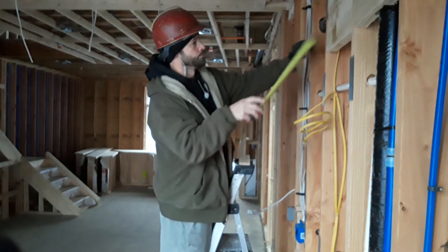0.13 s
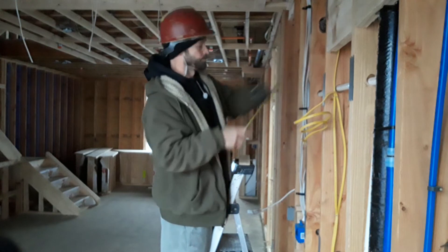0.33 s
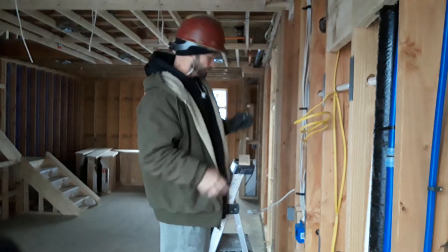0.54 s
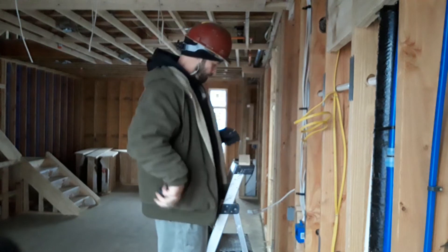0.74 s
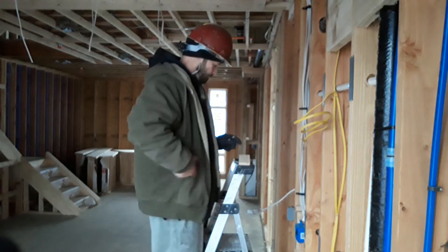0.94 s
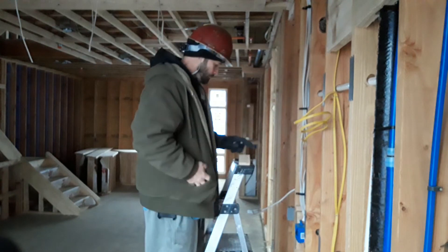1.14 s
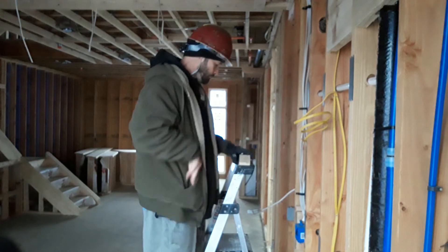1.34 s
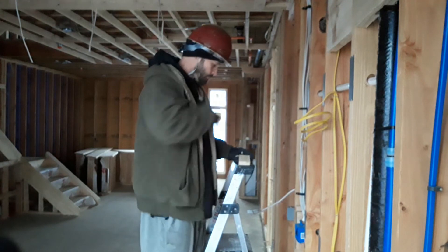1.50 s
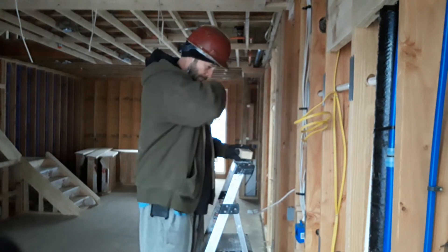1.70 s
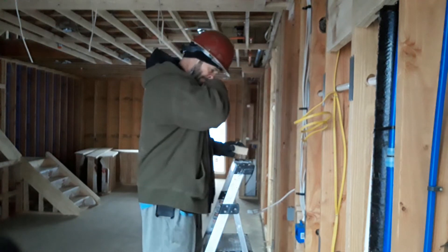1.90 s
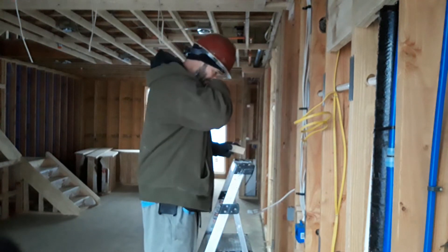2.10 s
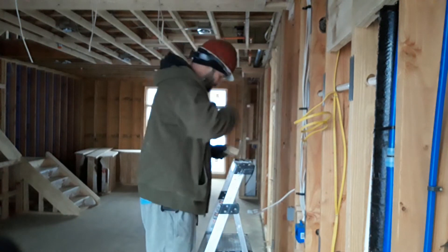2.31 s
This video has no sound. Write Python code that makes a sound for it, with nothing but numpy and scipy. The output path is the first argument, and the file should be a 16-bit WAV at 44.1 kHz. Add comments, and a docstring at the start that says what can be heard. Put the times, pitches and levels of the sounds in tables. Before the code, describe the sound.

A steel tape measure blade starts running back with a light clack at 0.1 s, rasping brightly with slaps around 0.25 and 0.33 s. At 0.49 s the hook slams into the case, a loud hard snap with rapid bounces and short room reverberation. Faint clacks follow near 1.3 and 1.6 s, then jacket rustle and a clearer knock around 2.05 s. A low wavering engine hum continues throughout.

```python
"""Tape measure snapping shut

A steel tape measure runs back into its case in a bare timber-framed room: grains of noise scrape, short
bursts slap, then the hook slams home, bounces and rings the case through banks of resonances. Light clacks
and knocks fall around it as damped bursts, a jacket sleeve rubs as coloured grains, and an engine outside
hums as a stack of wavering sines over drone and noise. A small two-port microphone hears it."""
import sys
import numpy as np
from scipy import signal
from scipy.fft import rfft, irfft
from scipy.io import wavfile
from scipy.ndimage import uniform_filter1d, minimum_filter1d

SR = 44100
rng = np.random.default_rng(int(sys.argv[2]) if len(sys.argv) > 2 else 0)


def bounce(signal):
    """Save signal as a 16-bit WAV file at the path given by the first command-line argument."""
    frames = np.transpose(np.atleast_2d(signal))
    limited = np.clip(frames, -1, 1)
    pcm = np.round(limited * 32767).astype(np.int16)
    wavfile.write(sys.argv[1], SR, pcm)


N = 103635
T = np.arange(N) / SR  # time [s]

# Source levels are set ahead of the room and the microphone; colours and modes are relative.
# Scrape of the running blade: (time [s], level [dB])
BLADE_RUN = [(0, -69), (.05, -51.5), (.072, -36.5), (.11, -47.5), (.135, -47.5), (.152, -33.5), (.19, -33),
             (.235, -35), (.3, -34), (.335, -34), (.37, -36), (.48, -36.5)]
# Colour of the blade: (frequency [Hz], level [dB])
BLADE_COLOUR = [(150, -23), (400, -12.5), (900, -8.5), (1500, -3), (2300, 1), (3500, 6), (5000, -2.5),
                (7000, 6), (9000, 1), (12000, 3), (15500, 3.5)]
# Resonances of the blade and its spool: (frequency [Hz], width before damping [Hz], level [dB])
BLADE_MODES = [(2370, 15, -7), (4690, 56, -5.5), (5100, 43, -5), (5430, 190, 3), (6930, 144, -10)]
BLADE_RING_DB, BLADE_DAMPING = -10.5, 2.6  # damping multiplies the mode widths
BLADE_GRAINS_PER_S, BLADE_SPREAD_DB = 6400, -1.5
FLUTTER_DB, FLUTTER_HZ = 4, 70.7
# Slaps of the blade at the mouth of the case: (time [s], level [dB], chatter setting [s])
SLAPS = [(0.2475, 4, 0.0029), (0.2572, -8, 0.0025), (0.33, -2.5, .005), (.341, -8, 0.0061)]
# Colour of the slaps: (frequency [Hz], level [dB])
SLAP_COLOUR = [(200, -16), (600, -3.5), (1100, 3.5), (1600, 3.5), (2300, 2), (3500, 1), (5000, 6.5),
               (7000, 2.5), (15500, -0.5)]

# The hook hits the case and bounces: (time [s], level [dB], chatter setting [s])
SNAP = [(0.4855, 11.5, 0.0019), (0.4888, 8, 0.0028), (0.4955, 10, 0.0026), (.502, 3, 0.005),
        (0.5145, 4.5, 0.0049), (0.527, -4, 0.0055)]
# Crack of the hook: (frequency [Hz], level [dB])
CRACK_COLOUR = [(60, -42.5), (150, -41), (280, -12.5), (450, 0), (800, 1), (1400, 0.5), (2200, 5),
                (3300, 6), (4500, 2.5), (6500, 2.5), (9000, 4), (15500, -5)]
# Ring of the case: (frequency [Hz], width before damping [Hz], level [dB])
CASE_MODES = [(773, 160, -1), (1620, 43, -24), (2143, 180, 0.5), (2560, 105, -7), (3380, 84, 1),
              (3720, 23, -15), (4120, 40, -12.5), (4820, 140, -8), (5170, 150, 2.5), (5790, 44, 6.5),
              (6630, 78, 5), (6990, 35, -26)]
CASE_DB, CASE_DAMPING = -5.5, 1.51
# Hollow knock of the case wall at the first blow: (frequency [Hz], width [Hz], level [dB])
WALL_MODES = [(549, 130, -2.5), (811, 190, -2.5), (1111, 190, 5.5), (2127, 270, 9)]
WALL_DB = 10
PUSH_SHARE = 0.28  # weight of the sharp push in a blow, against its chatter

# Clacks and knocks of handled tools:
# (time [s], level [dB], pitch [Hz], width of each filter pass [Hz], chatter setting [s])
KNOCKS = [(0.104, -8.5, 971, 1400, 0.0012), (1.272, -26.5, 1190, 2430, 0.0054),
          (1.589, -20.5, 4310, 6500, 0.0034), (1.591, -17, 1200, 1400, 0.0025),
          (1.5932, -18, 2480, 1200, .001), (1.809, -25, 5500, 2980, 0.017), (2.037, -10, 840, 910, 0.0042),
          (2.047, -22, 2830, 600, .004), (2.291, -29, 4000, 5030, 0.0056)]

# Rubbing of the jacket: (time [s], level [dB])
SLEEVE_RUB = [(.9, -90), (1.24, -68.5), (1.29, -64.5), (1.39, -64), (1.5, -90.5), (1.6, -65), (1.64, -65),
              (1.7, -69), (1.78, -70), (1.87, -58), (1.97, -53.5), (2.08, -46.5), (2.2, -71), (2.35, -76)]
# Colour of the cloth: (frequency [Hz], level [dB])
SLEEVE_COLOUR = [(200, -4), (700, 9.5), (2000, 4), (4000, -4.5), (5200, 6), (7000, 3.5), (11000, 1.5),
                 (15500, -4)]
# Brief brushes and dull bumps of the clothing: (time [s], peak level [dB], pitch [Hz], length to 1/e [s])
BRUSHES = [(0.338, -49, 96, 0.059), (1.383, -51, 244, .05), (1.63, -55, 12000, 0.025)]

ENGINE_HZ = 26.07  # mean turning rate
# Hum of the engine, before the swell: {multiple of the turning rate: mean level [dB]}
ENGINE_ORDERS = {4: -67.5, 5: -51.5, 6: -50.5, 7: -56.5, 9: -61, 10: -58, 14: -67, 24: -67.5}
# A second, wavering drone, before the swell: (frequency [Hz], width of each filter pass [Hz], level [dB])
DRONE = [(117.3, 13, -54), (196.93, 4.5, -51.5), (398.4, 24.5, -65.5), (1142, 13, -67.5)]
# Colour of the background wash: (frequency [Hz], level [dB])
SITE_COLOUR = [(25, -23.5), (45, -12.5), (70, -3), (130, 4), (220, 0.5), (320, -6), (700, -10.5),
               (1400, -15.5), (2700, -20), (3800, -29.5), (7000, -32.5), (10000, -40.5), (15500, -34.5)]
WASH_DB, WASH_WOBBLE_DB = -47, .8  # before the swell
# Swell of hum, drone and wash together: (time [s], gain [dB])
SITE_SWELL = [(0, 5), (.2, 5.5), (.35, 9), (.55, 3.5), (.8, -0.5), (1.1, -2.5), (1.4, 0), (1.6, -1.5),
              (1.85, 3), (2.1, 4), (2.35, 4.5)]

# Reverberation tail: (frequency [Hz], time to fall 60 dB [s])
ROOM_T60 = [(150, 0.94), (700, 0.74), (2000, 0.6), (4000, 0.49), (7000, 0.38), (15000, 0.3)]
ROOM_DB, KNOCK_ROOM_DB = 1.5, -5  # reflections of the tape and sleeve, and of the knocks
DIRECT_DB = -2.5  # the body shades the direct path
EARLY_DB, EARLY_T60_S = 4, 0.19  # first reflections, against the long tail
ROOM_BUILD_S = 0.00067
PORT_LAG_S, SHARED_BASS_HZ = 0.0004156, 300
# Colour of the two microphone ports: (frequency [Hz], left level [dB], right level [dB])
PORTS = [(101.3, -3, -2), (194, -2, -3.5), (380, -4, 1), (705, .5, -1.5), (1340, 0, -1.5), (2180, 4, -6),
         (3330, 1.5, 0.5), (6200, -0.5, -1.5), (6800, -9, 1), (7214, -12, 3), (8460, -26, -15.5),
         (10500, -15.5, -7), (13200, -15.5, -13), (15500, -12, -7.5)]
LIMIT_DB, LIMIT_S = -.3, .002  # ceiling ahead of the top cut, and smoothing time
TOP_HZ = 15900


def blade():
    """The blade scrapes in flickering grains until the hook arrives, slapping at the mouth of the case."""
    running = T < SNAP[0][0]
    flutter = undb(FLUTTER_DB * walk(FLUTTER_HZ))
    scrape = grains(BLADE_GRAINS_PER_S, BLADE_SPREAD_DB) * flutter * curve(BLADE_RUN) * running
    slaps = sum(undb(db) * contact(at, chatter) for at, db, chatter in SLAPS)
    ring = undb(BLADE_RING_DB) * ringing(BLADE_MODES, BLADE_DAMPING)
    steel = unit_energy(response(BLADE_COLOUR)) + ring
    return through(scrape, unit_energy(steel)) + through(slaps, unit_energy(response(SLAP_COLOUR)))


def snap():
    """The hook slams home with a hollow knock and bounces; each blow cracks and rings the case."""
    blows = sum(undb(db) * contact(at, chatter) for at, db, chatter in SNAP)
    ring = undb(CASE_DB) * ringing(CASE_MODES, CASE_DAMPING)
    clatter = through(blows, unit_energy(response(CRACK_COLOUR)) + ring)
    first = signal.unit_impulse(N, int(SNAP[0][0] * SR))
    hollow = through(first, ringing(WALL_MODES, damping=1))
    return clatter + undb(WALL_DB) * hollow


def knocks():
    """Light blows, each into one quickly damped resonance."""
    total = 0
    for at, db, hz, width, chatter in KNOCKS:
        clack = band(contact(at, chatter), hz, width)
        total = total + undb(db) * unit_energy(clack)
    return total


def sleeve():
    """Cloth fibres slip as the arm moves, with a few brief brushes and bumps."""
    fibres = grains(per_s=8300, spread_db=4.0)
    sound = through(fibres, unit_energy(response(SLEEVE_COLOUR))) * curve(SLEEVE_RUB)
    for at, db, hz, length in BRUSHES:
        swell = np.exp(-((T - at) / length) ** 2)
        sound = sound + undb(db) * swell * unit(band(rng.standard_normal(N), hz, hz * .8))
    return sound


def site():
    """An engine hums through the walls over a wavering drone and a dull wash of noise."""
    turns = np.cumsum(ENGINE_HZ * (1 + 0.0024 * walk(2.95))) / SR
    port_phase = np.array([[.3], [-.3]])  # radians, left and right
    hum = 0
    for order, db in ENGINE_ORDERS.items():
        phase = 2 * np.pi * (order * turns + rng.random()) + port_phase
        hum = hum + np.sqrt(2) * undb(db + 1.3 * walk(6.41)) * np.sin(phase)
    air = diffuse_pair()
    drone = sum(undb(db) * unit(band(air, hz, width)) for hz, width, db in DRONE)
    wash = unit(np.array([through(port, response(SITE_COLOUR)) for port in diffuse_pair()]))
    wash_gain = undb(WASH_DB + WASH_WOBBLE_DB * walk(7.3))
    return (hum + drone + wash_gain * wash) * curve(SITE_SWELL)


def room(x, wet_db):
    """Direct sound, a little late on the left, plus a freshly scattered set of reflections."""
    direct = [np.interp(T - PORT_LAG_S, T, x), x]
    ports = []
    for near, ir in zip(direct, reflections()):
        ports.append(undb(DIRECT_DB) * near + undb(wet_db) * through(x, ir))
    return np.array(ports)


def reflections(count=14):
    """Two-port room response: dense early echoes off studs and floor, then a tail that dies sooner in the treble."""
    hz = np.fft.rfftfreq(N, 1 / SR)
    centres = np.geomspace(100, 16000, count)
    scatter, tail = rfft(diffuse_pair()), 0
    early = undb(EARLY_DB) * np.exp(-np.log(1000) * T / EARLY_T60_S)
    # Overlapping bands, each with its own decay
    for centre, share in zip(centres, np.eye(count)):
        part = irfft(scatter * over_hz(hz, list(zip(centres, share))), N)
        late = np.exp(-np.log(1000) * T / over_hz(centre, ROOM_T60))
        tail = tail + part * (early + late)
    build = 1 - np.exp(-T / ROOM_BUILD_S)
    return [unit_energy(port * build) for port in tail]


def diffuse_pair():
    """Noise from all around: the ports share its bass and hear the treble apart."""
    hz = np.fft.rfftfreq(N, 1 / SR)
    shared = 1 / (1 + (hz / SHARED_BASS_HZ) ** 2)
    mid, side = rfft(rng.standard_normal((2, N)))
    mid = mid * np.sqrt((1 + shared) / 2)
    side = side * np.sqrt((1 - shared) / 2)
    return irfft(np.array([mid + side, mid - side]), N)


def contact(at, chatter_s):
    """A blow of energy 1: one sharp push and a short chatter of the surfaces, nearly even in colour."""
    age = T - at
    fade = (age >= 0) * np.exp(-np.abs(age) / chatter_s)
    spectrum = rfft(rng.standard_normal(N) * fade)
    even = irfft(spectrum / np.abs(spectrum), N)  # keeps the phases, levels the colour
    burst = unit_energy(even * fade ** .25)
    burst[int(at * SR)] -= PUSH_SHARE
    return unit_energy(burst)


def grains(per_s, spread_db):
    """Dense tiny slips of uneven size, at rms 1."""
    struck = rng.random(N) < per_s / SR
    sign = rng.choice([-1, 1], N)
    size = undb(spread_db * np.minimum(rng.exponential(size=N), 4))
    return unit(struck * sign * size)


def ringing(modes, damping):
    """Impulse response of a body, at energy 1; damping widens its (Hz, width, dB) modes."""
    tap = signal.unit_impulse(N)
    return unit_energy(sum(undb(db) * resonate(tap, hz, width * damping) for hz, width, db in modes))


def resonate(x, hz, width):
    """Two-pole resonance, gain 1 at the centre, no wider than a quarter of the sample rate."""
    return signal.lfilter(*signal.iirpeak(hz, hz / min(width, SR / 4), fs=SR), x)


def band(x, hz, width):
    """A resonance applied twice, for steep sides."""
    return resonate(resonate(x, hz, width), hz, width)


def response(points, size=4096):
    """Minimum-phase impulse response with the colour of (Hz, dB) points."""
    gain = undb(over_hz(np.fft.rfftfreq(size, 1 / SR), points))
    cepstrum = irfft(np.log(gain))
    # Folding the cepstrum forward makes the response causal
    cepstrum[1:size // 2] *= 2
    cepstrum[size // 2 + 1:] = 0
    return np.pad(irfft(np.exp(rfft(cepstrum))), (0, N - size))


def through(x, ir):
    """Pass a sound through an impulse response."""
    return signal.fftconvolve(x, ir)[:N]


def walk(rate):
    """Smooth random drift with rms 1, from rate fresh values a second."""
    k = int(SR / rate)
    steps = np.repeat(rng.standard_normal(N // k + 1), k)
    return unit(uniform_filter1d(uniform_filter1d(steps, k), k)[:N])


def curve(points):
    """Gain over time from (s, dB) points."""
    return undb(np.interp(T, *np.array(points).T))


def over_hz(hz, points):
    """Read (Hz, value) points on a log-frequency axis."""
    f, value = np.array(points).T
    return np.interp(np.log(np.maximum(hz, 1)), np.log(f), value)


def undb(db):
    """Decibels to gain."""
    return 10 ** (np.asarray(db) / 20)


def unit(x):
    """Scale to rms 1."""
    return x / np.sqrt(np.mean(x ** 2))


def unit_energy(ir):
    """Scale a sound or response to energy 1."""
    return ir / np.sqrt(np.sum(ir ** 2))


def scene():
    """The tape and the handling sounds in the room, over the site."""
    tape_and_sleeve = room(blade() + sleeve(), ROOM_DB) + room(snap(), ROOM_DB)
    return tape_and_sleeve + room(knocks(), KNOCK_ROOM_DB) + site()


def record(dry):
    """Each port has its own colour; a fast limiter holds the peaks and the top is cut."""
    ports = []
    for k in range(2):
        colour = [(row[0], row[k + 1]) for row in PORTS]
        ports.append(through(dry[k], response(colour)))
    coloured = np.array(ports)
    # One gain for both ports, dipping ahead of each peak
    hold = int(LIMIT_S * SR)
    ceiling = undb(LIMIT_DB)
    allowed = ceiling / np.maximum(np.abs(coloured).max(axis=0), ceiling)
    gain = uniform_filter1d(minimum_filter1d(allowed, 2 * hold), hold)
    top_cut = signal.ellip(10, .1, 80, TOP_HZ, fs=SR, output="sos")
    return signal.sosfilt(top_cut, coloured * gain)


dry = scene()
out = record(dry)
bounce(out)
```